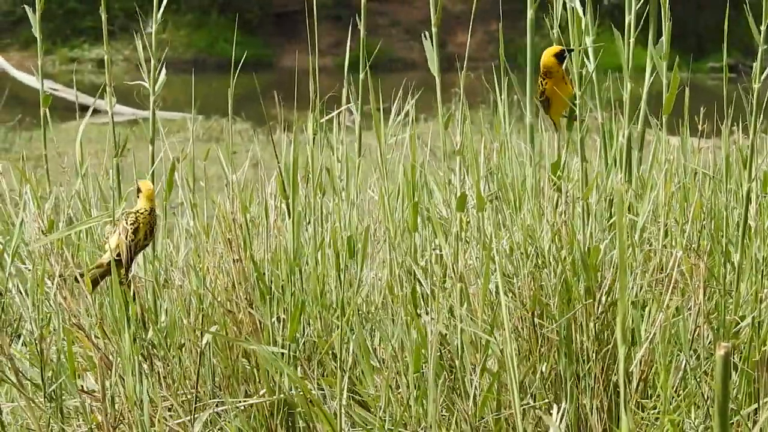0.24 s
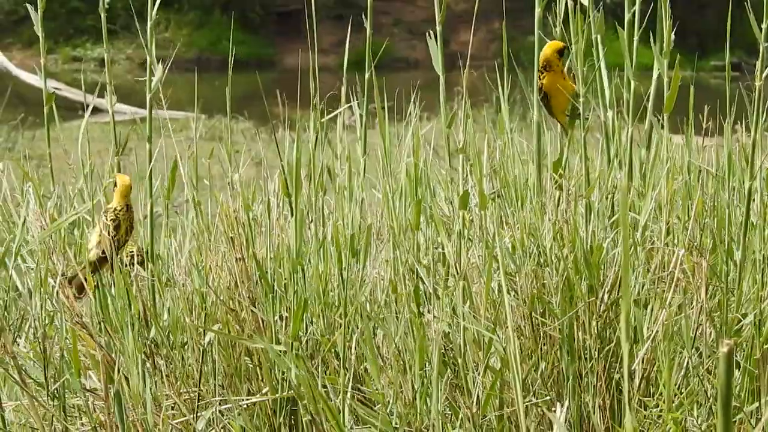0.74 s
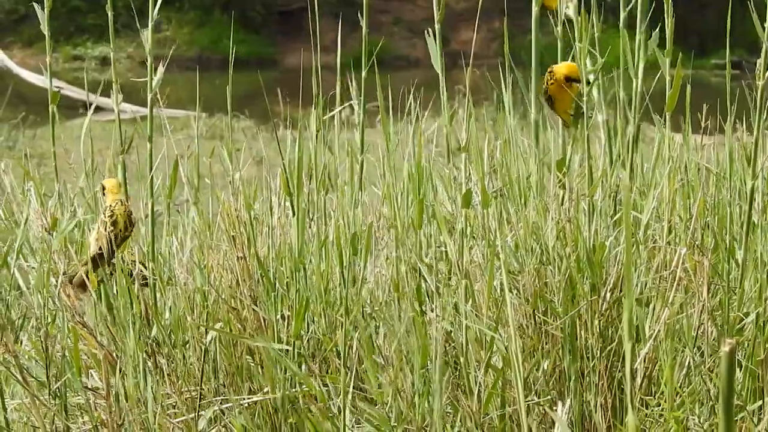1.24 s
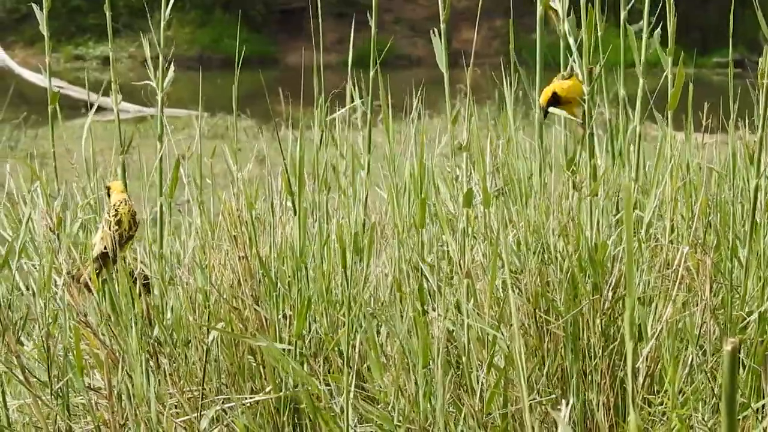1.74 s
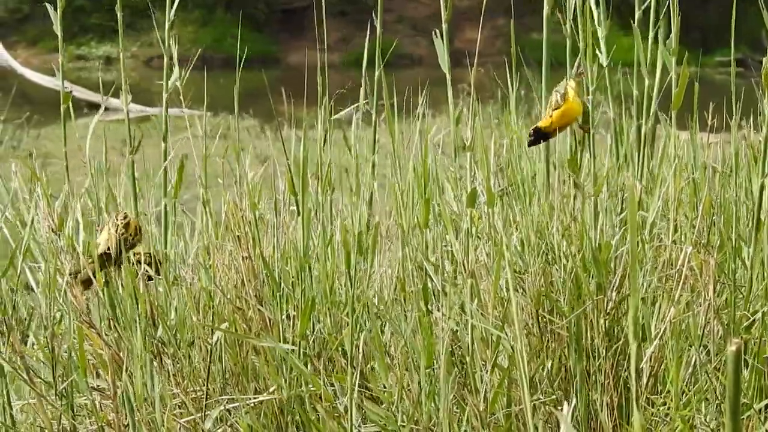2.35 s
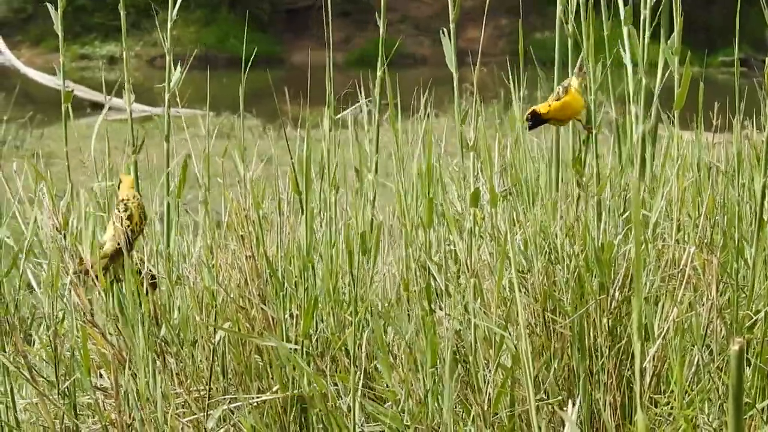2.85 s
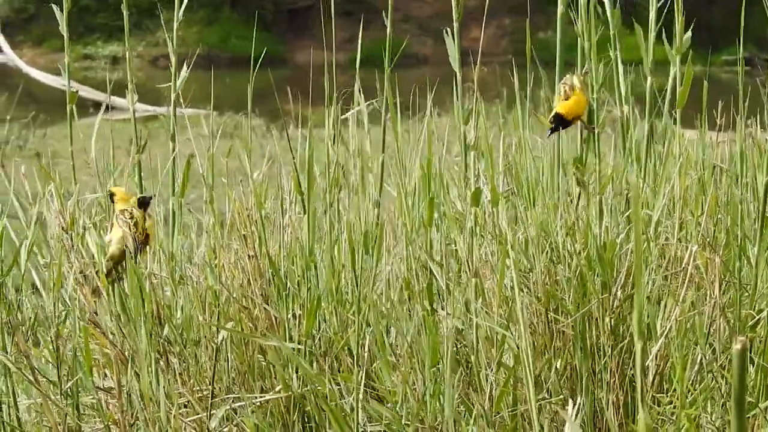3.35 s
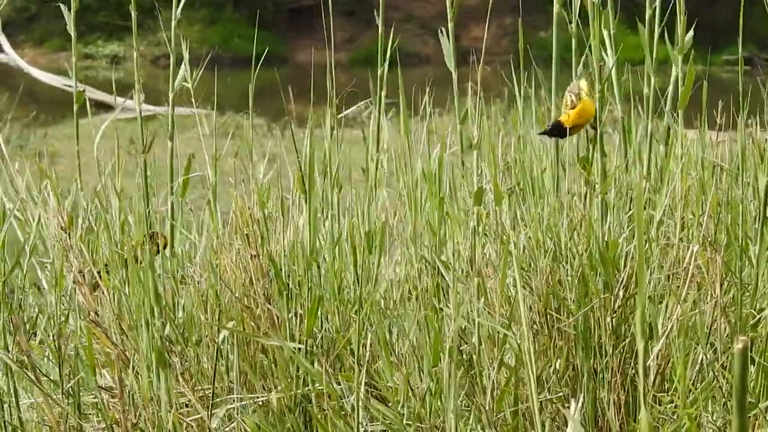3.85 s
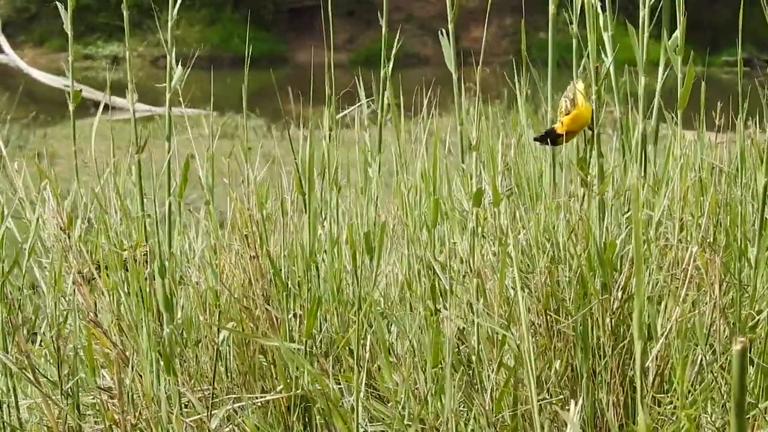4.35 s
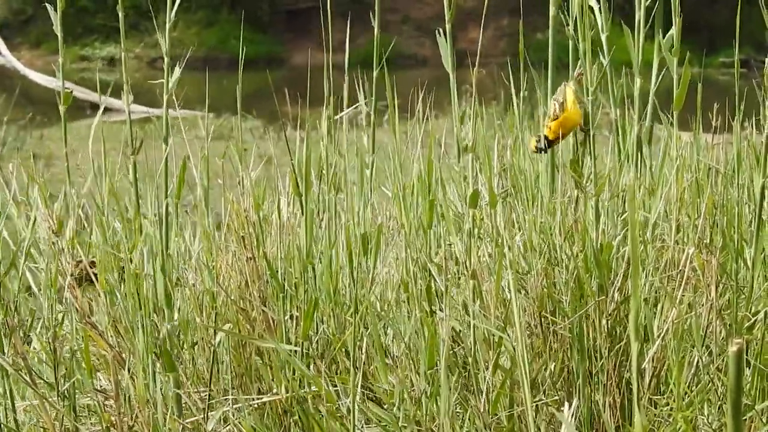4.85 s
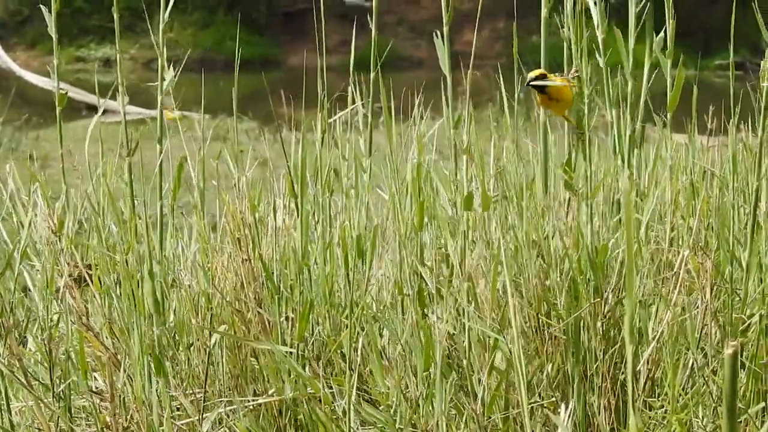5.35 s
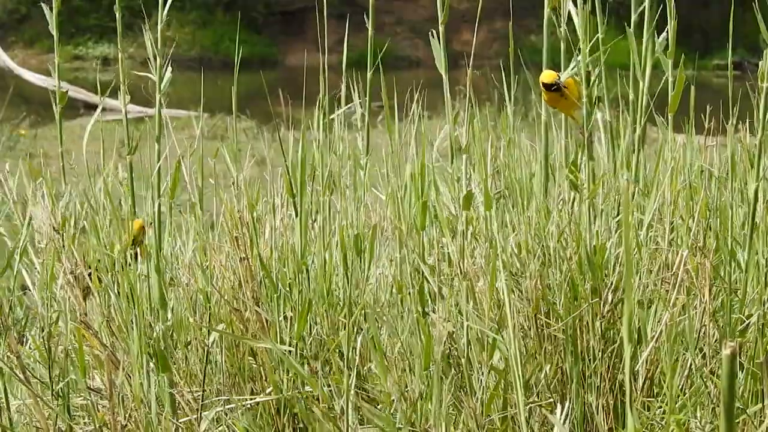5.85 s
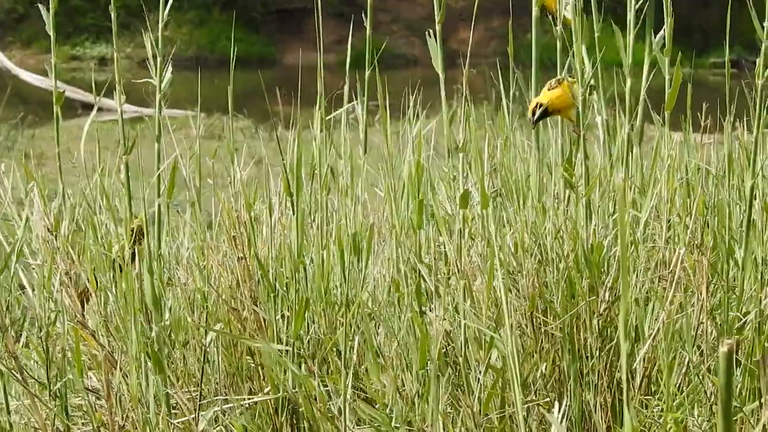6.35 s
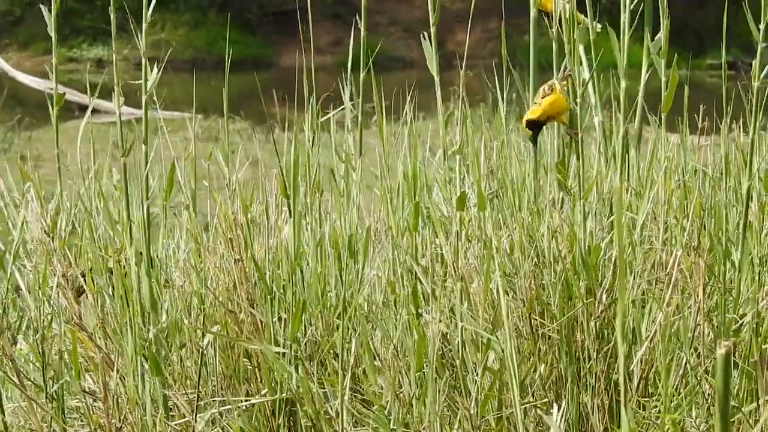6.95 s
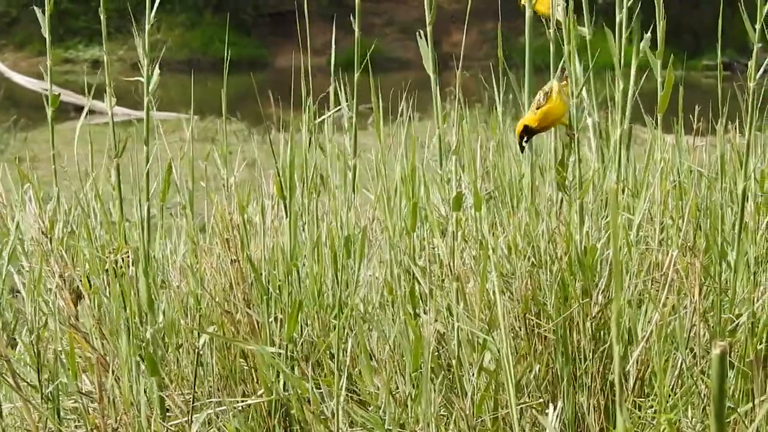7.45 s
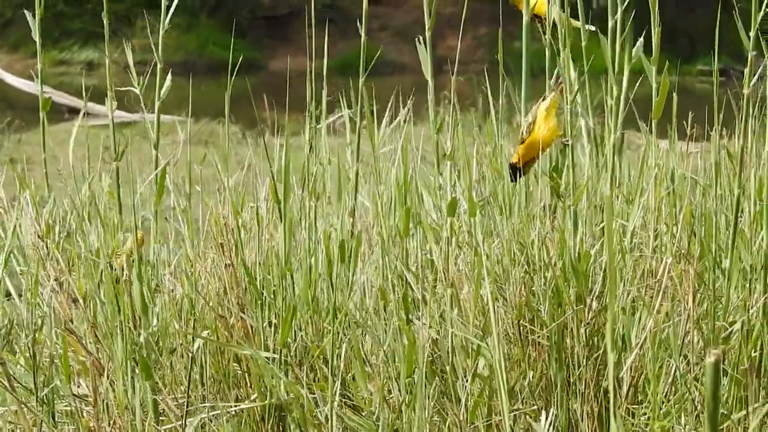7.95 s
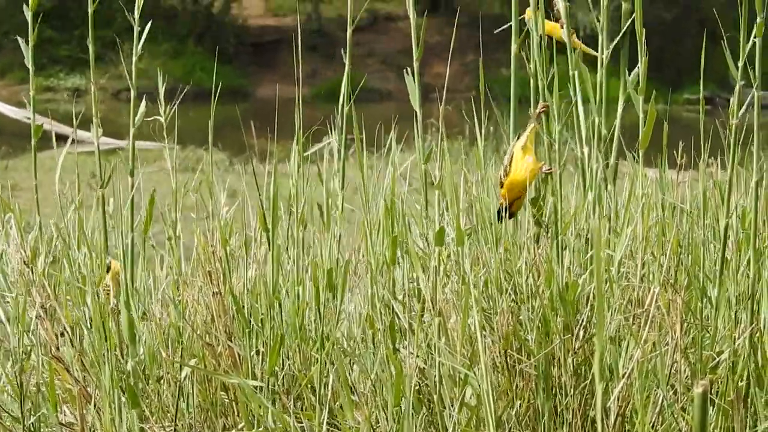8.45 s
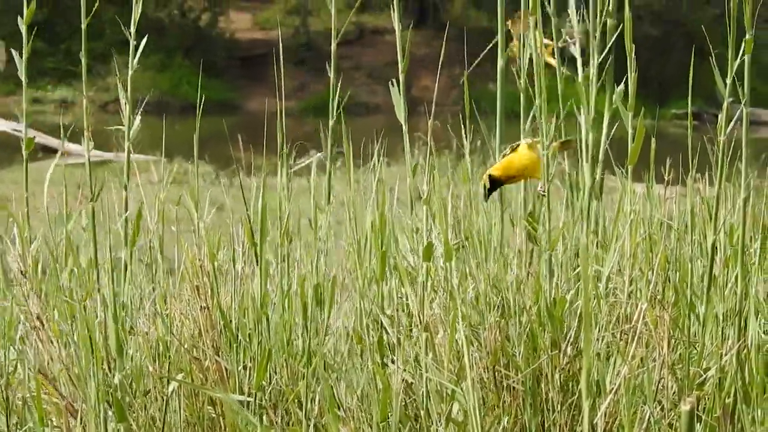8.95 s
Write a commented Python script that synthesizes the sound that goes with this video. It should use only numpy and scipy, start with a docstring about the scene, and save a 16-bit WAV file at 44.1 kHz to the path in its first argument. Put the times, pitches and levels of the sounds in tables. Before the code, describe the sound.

Harsh bird babble and shimmering high cricket trills outdoors; sharp double chips come first, then loud whistles, clicks and a buzzy wheeze build.

```python
"""Harsh chatter comes from all round a weaver colony in lakeside reeds: noisy pulses through throat bands.
Near, on the right of the stereo microphone, a male adds chips, sliding clicks, whistles and slides, all
bending tones, and a wheeze of pulses and breath in a two-resonance throat. Crickets trill in the grass as
scraped resonances; far traffic hums in narrow wavering bands over rumble; the banks return a short tail."""
import sys
import numpy as np
from scipy import signal
from scipy.fft import rfft, irfft, next_fast_len
from scipy.io import wavfile
from scipy.ndimage import uniform_filter1d, map_coordinates

SR = 44100
rng = np.random.default_rng(int(sys.argv[2]) if len(sys.argv) > 2 else 0)


def int16_out(signal):
    """Quantize to a 16-bit WAV file."""
    q = np.round(np.clip(np.atleast_2d(signal).T, -1, 1) * 32767)
    wavfile.write(sys.argv[1], SR, q.astype(np.int16))


N = 405719
TIME = np.arange(N) / SR  # seconds

# The near male's slides. Each row: start in seconds, length in seconds, start pitch in Hz, end pitch in Hz,
# level in dB.
SLIDE_NOTES = [(3.365, 0.04, 4600, 3930, -56), (3.391, .04, 3010, 2530, -60),
               (4.174, 0.044, 2900, 2170, -58), (4.172, 0.026, 2300, 1920, -65),
               (4.1, 0.033, 3880, 2980, -60), (3.645, .03, 3600, 2710, -60), (1.955, 0.1, 3710, 3240, -66),
               (4.182, 0.04, 3750, 3350, -53), (4.305, .016, 2710, 3570, -47.5),
               (4.28, .035, 3590, 2970, -56), (4.27, 0.032, 2300, 2050, -58),
               (4.165, 0.065, 5030, 4550, -56), (4.287, .045, 4900, 4480, -52),
               (4.393, 0.11, 1936, 2980, -49.5), (4.456, 0.0073, 5220, 4090, -30),
               (4.458, 0.02, 3190, 3500, -42), (4.677, 0.02, 4270, 4610, -34),
               (4.277, 0.041, 2910, 2400, -52), (4.385, 0.064, 4050, 5830, -47),
               (4.61, .022, 2320, 2570, -52), (4.614, 0.053, 4830, 6300, -43),
               (4.946, 0.026, 4280, 4540, -31.5), (5.136, 0.055, 4180, 4270, -40.5),
               (5.497, 0.016, 3630, 3170, -33), (5.728, 0.0306, 4320, 4930, -26),
               (5.413, .092, 4080, 4840, -43), (5.562, .016, 4570, 5900, -31.5),
               (5.623, 0.037, 7200, 5200, -29), (5.643, 0.0055, 4080, 5550, -23.5),
               (5.924, 0.01, 7440, 5200, -25.5), (6.001, .1, 7440, 4380, -21.5),
               (6.153, 0.026, 4410, 4900, -26), (6.298, 0.028, 5350, 5330, -33),
               (6.463, 0.0634, 1990, 2790, -46.5), (6.489, 0.0074, 5410, 4200, -23),
               (6.484, 0.046, 4300, 3400, -33), (6.8, 0.014, 5970, 4110, -30),
               (6.814, 0.023, 4290, 4470, -32), (6.84, 0.035, 4210, 4770, -28),
               (6.874, 0.021, 4370, 4120, -29.5), (6.981, .05, 6320, 4540, -32),
               (6.999, 0.05, 9180, 7700, -52), (7.057, 0.11, 7700, 4535, -22),
               (7.229, 0.0103, 3860, 5070, -23), (7.166, 0.05, 3790, 2816, -37.5),
               (7.71, 0.0086, 6870, 4490, -18), (7.739, 0.012, 5480, 4220, -24),
               (7.77, .009, 6950, 4190, -23), (7.915, 0.027, 5600, 4520, -22.5),
               (7.979, 0.073, 4780, 4426, -21.5), (8.086, 0.041, 5490, 4550, -21.5),
               (8.138, .122, 7520, 4470, -18), (8.3, 0.033, 3830, 2840, -43),
               (8.307, 0.053, 2974, 2572, -37.5), (8.397, .035, 5410, 5120, -27),
               (8.959, 0.02, 2440, 2730, -51.5), (9.039, 0.0216, 2110, 3010, -51)]
# His whistles, held and then bent. Each row: start in seconds, length in seconds, held pitch in Hz,
# end pitch in Hz, level in dB.
HELD_NOTES = [(0.126, 0.073, 2820, 2520, -56), (0.901, 0.076, 2830, 2750, -61),
              (1.225, 0.074, 2370, 2680, -55), (1.638, 0.055, 3410, 3130, -57),
              (2.216, 0.11, 3004, 2950, -58.5), (3.266, .03, 886, 870, -59), (3.46, .04, 2640, 2530, -60),
              (3.49, 0.12, 3300, 3200, -63), (3.522, 0.031, 4930, 4760, -50),
              (3.517, 0.034, 2500, 2280, -55), (3.613, 0.041, 4020, 3880, -55),
              (3.62, 0.034, 3030, 3090, -60), (3.828, 0.036, 4280, 4230, -50),
              (3.864, 0.12, 3435, 3540, -59), (3.951, .03, 4550, 4500, -52),
              (4.077, 0.024, 4050, 3950, -53), (4.423, .04, 4860, 5310, -33),
              (4.496, 0.082, 5000, 4950, -49), (4.702, 0.05, 5500, 5300, -37),
              (4.47, 0.023, 4820, 4500, -36), (4.41, 0.074, 5890, 5850, -44),
              (4.624, 0.068, 3290, 3096, -40.5), (4.654, 0.067, 6370, 6720, -30.5),
              (4.692, 0.024, 4180, 3840, -40), (4.885, 0.0575, 3184, 3430, -37.5),
              (4.952, 0.02, 2340, 2230, -46.5), (4.964, 0.041, 4000, 3960, -41),
              (4.968, .035, 5500, 5450, -44), (5.205, 0.028, 3975, 4040, -36.5),
              (5.499, 0.141, 3175, 2910, -43), (5.576, 0.12, 3670, 3820, -38.5),
              (5.588, 0.061, 7380, 6860, -33.5), (5.679, 0.056, 3870, 3850, -54),
              (5.753, 0.033, 4320, 4230, -30.5), (5.829, 0.115, 4590, 4566, -21),
              (5.932, 0.031, 5570, 4900, -24), (5.961, 0.024, 2950, 2360, -43),
              (6.11, 0.051, 6180, 5300, -25.5), (6.222, 0.052, 3240, 2760, -36),
              (6.334, 0.048, 5260, 5210, -22.5), (6.402, 0.028, 5230, 4820, -29),
              (6.434, 0.038, 5260, 5180, -30), (6.463, 0.0346, 5470, 5190, -18.5),
              (6.499, 0.047, 5220, 5370, -27), (6.538, 0.056, 5440, 4970, -29),
              (6.63, 0.047, 3180, 2830, -29.5), (6.641, 0.045, 5490, 4960, -30),
              (6.649, 0.027, 9100, 9200, -51), (6.68, 0.033, 4610, 3790, -27.5),
              (6.777, 0.062, 3570, 3470, -48), (6.811, 0.045, 2810, 2170, -43.5),
              (6.893, 0.056, 3010, 3150, -33), (6.897, 0.074, 4557, 4533, -26),
              (6.959, 0.016, 4590, 4420, -18.5), (6.962, 0.13, 2118, 1810, -43.5),
              (6.985, 0.035, 4490, 4460, -41), (7.038, 0.062, 5350, 5430, -34),
              (7.235, 0.02, 3990, 4270, -28.5), (7.236, 0.02, 5040, 4510, -21.5),
              (7.453, 0.076, 3317, 2870, -36.5), (7.526, 0.029, 3230, 3170, -53),
              (7.64, 0.036, 5530, 5670, -24), (7.651, 0.033, 4706, 4450, -19.5),
              (7.722, 0.055, 5600, 5430, -28), (8.107, 0.03, 3056, 2490, -38.5),
              (8.445, 0.1, 5430, 4990, -24.5), (8.55, 0.033, 5320, 4400, -30),
              (8.588, 0.062, 5390, 5420, -27.5)]
# Where a note stands: higher ones lie further right. Each row: pitch in Hz, left over right in dB.
NOTE_PAN = [(2500, -0.5), (4000, -1), (5500, -7)]
# Double chips. Each row: start in seconds, chip level in dB, snap level in dB.
DOUBLE_CHIPS = [(0.023, -26, -23), (0.3634, -26, -21.5), (0.7435, -26.5, -25.5), (1.0544, -26.5, -24.5),
                (1.4641, -29.5, -22.5), (8.7881, -23, -14.5)]
# Sliding clicks, single or in rattled trills. Each row: start in seconds, length in seconds,
# clicks per second, pitch in Hz, fall of one click in natural-log pitch (negative rises), level in dB.
SLIDING_CLICKS = [(4.448, .04, 200, 2690, 0.23, -47), (4.678, .006, 75, 3070, 1, -25),
                  (4.686, .035, 186, 2350, -0.39, -40.5), (4.942, 0.0051, 80, 3300, 1.1, -23),
                  (4.458, .005, 84, 3640, 0.51, -28), (4.95, .022, 218, 2200, -.3, -46),
                  (7.605, .065, 180, 2870, -0.29, -38), (4.697, 0.07, 194, 4970, 0.4, -27.5),
                  (4.47, .04, 220, 4780, .3, -33), (5.21, .034, 230, 4960, -.15, -27),
                  (5.215, .03, 233, 3990, -.1, -30.5), (5.2, .04, 205, 2600, -0.54, -40.5),
                  (7.376, .02, 170, 4770, 0.019, -31), (5.12, .09, 150, 2910, .5, -38.5),
                  (5.133, .056, 128, 4250, .12, -29.5), (5.186, .03, 210, 4180, .3, -34),
                  (4.68, .03, 240, 4500, -.2, -28.5), (5.291, 0.064, 212, 6070, -0.22, -19),
                  (5.325, 0.057, 166, 2680, -0.55, -39.5), (5.398, 0.095, 137, 5340, -0.43, -29.5),
                  (5.647, 0.046, 220, 5290, 0.23, -27), (5.752, 0.097, 120, 3590, -0.67, -31.5),
                  (6.266, .04, 217, 6640, 0.18, -24.5), (6.295, .045, 220, 6240, 0.18, -18),
                  (6.696, .06, 170, 4400, .2, -36), (7.134, 0.067, 152, 4230, 0.34, -21.5),
                  (7.309, .03, 98, 2890, 0.66, -29), (7.7, 0.022, 185, 4450, 0.0032, -27),
                  (7.79, 0.025, 170, 4570, .2, -22), (7.833, 0.03, 285, 4900, -0.35, -17),
                  (7.835, 0.045, 190, 2970, 0.0092, -32.5), (7.931, 0.068, 89, 4825, -0.29, -17.5)]
# The male's wheezes. Each row: start in seconds, end in seconds, throat centre in Hz, level in dB.
WHEEZES = [(1.167, 1.356, 5940, -42.5), (6.742, 7.705, 5748, -25.5), (7.913, 8.392, 6004, -25.5)]
# Harsh "chek" calls of the nearer birds. Each row: start in seconds, length in seconds before smearing,
# low-band level in dB before shaping.
CHEK_CALLS = [(0.11, 0.025, -59), (0.194, 0.024, -62), (0.27, 0.025, -60.5), (0.353, 0.066, -54),
              (0.532, 0.055, -55), (0.646, 0.033, -58), (0.693, 0.019, -60), (0.73, 0.098, -61.5),
              (0.864, 0.091, -63), (1.043, 0.083, -59.5), (1.12, 0.04, -57), (1.183, 0.014, -55.5),
              (1.367, 0.051, -62), (1.42, 0.021, -59), (1.454, 0.081, -56), (1.657, 0.059, -57),
              (1.792, 0.05, -56.5), (1.834, 0.068, -54.5), (1.905, .03, -63.5), (2.04, 0.056, -56.5),
              (2.11, 0.11, -59.5), (2.163, 0.03, -69.5), (2.336, 0.053, -56), (2.38, 0.027, -55),
              (2.406, .05, -60.5), (2.578, 0.047, -61), (2.608, 0.061, -53.5), (2.808, 0.023, -62),
              (2.666, 0.038, -56.5), (2.927, 0.022, -58), (2.974, 0.029, -57), (3.039, 0.053, -62.5),
              (3.126, 0.068, -62.5), (3.203, 0.041, -63), (3.434, 0.17, -63), (3.306, 0.03, -64),
              (3.66, 0.03, -61), (3.703, .018, -67), (3.864, 0.03, -60.5), (3.974, 0.026, -58),
              (4.026, 0.015, -55.5), (4.059, 0.026, -56.5), (4.199, 0.031, -54), (4.252, 0.011, -55.5),
              (4.255, 0.1, -67), (4.465, 0.045, -51.5), (4.52, .035, -59.5), (4.683, 0.05, -57),
              (4.75, 0.082, -58), (4.947, 0.06, -59), (5.039, 0.047, -60), (5.122, 0.15, -59),
              (5.352, 0.17, -64), (5.545, 0.099, -55.5), (5.778, 0.08, -61.5), (5.929, 0.019, -59),
              (5.971, 0.13, -56), (6.082, 0.15, -63.5), (6.411, 0.14, -56), (6.596, 0.19, -59.5),
              (6.861, 0.067, -59.5), (7.16, 0.091, -59.5), (7.307, 0.029, -65), (7.485, 0.061, -54.5),
              (7.61, 0.065, -60), (7.776, 0.051, -54), (7.835, 0.016, -53.5), (7.941, 0.078, -65),
              (8.256, 0.042, -60), (8.42, 0.051, -58), (8.516, 0.11, -58), (8.605, 0.033, -59),
              (8.68, 0.025, -66.5), (8.757, 0.12, -64), (8.933, .024, -67), (8.998, 0.07, -64)]
# Shrillness of the cheks, growing as the song builds and dropping at the end. Each row: time in seconds,
# high band over low band in dB.
CHEK_SHRILLNESS = [(0, 7.5), (2, 8.5), (3, 7.5), (4.2, 8), (4.9, 14), (6.2, 19), (8.8, 19.5), (9.2, 7)]
# The colony's blurred babble. Each row: time in seconds, low-band level in dB, high-band level in dB.
BABBLE_LEVELS = [(0.0, -66, -52), (0.87, -72.5, -62.5), (1.61, -68, -56), (2.43, -81.5, -76),
                 (3.61, -74.5, -70), (4.9, -70, -56.5), (5.1, -68.5, -68), (5.16, -66, -49),
                 (6.02, -61.5, -45), (6.2, -58, -39.5), (6.35, -61, -46), (6.48, -61, -42),
                 (7.15, -60, -40), (7.48, -61.5, -57.5), (7.76, -60, -29), (7.825, -62.5, -55),
                 (7.85, -60.5, -38), (8.0, -60, -33), (8.3, -63, -57.5), (8.87, -68.5, -68),
                 (9.2, -69, -58.5)]
# Lower throat band of the chatter. Each row: frequency in Hz, response in dB.
LOW_THROAT_BAND = [(700, -26), (1100, -1), (1500, 7.5), (2100, 10.5), (2700, 8), (3200, 1.5), (4000, -29.5)]
# Upper throat band of the chatter. Each row: frequency in Hz, response in dB.
HIGH_THROAT_BAND = [(3300, -33), (4000, -5), (4600, 5.5), (5500, 5), (6500, 7.5), (7600, 0.5),
                    (9000, -14.5), (10500, -37.5), (15000, -70.5)]
# Extra band of excited calls. Each row: frequency in Hz, response in dB.
OPEN_BEAK_BAND = [(1800, -38.5), (2400, -3), (3000, 4.5), (3500, 4), (4200, -34)]
# Treble of the male's song and the colony's slides after air and reeds. Each row: frequency in Hz,
# response in dB.
REED_RESPONSE = [(6800, -3.5), (8500, 3.5), (11000, -8.5), (15000, -22)]
# Bouts of near crickets. Each row: start in seconds, end in seconds, steady pitch in Hz, level in dB,
# left over right in dB.
CRICKET_BOUTS = [(0, 0.395, 6630, -38.5, 5), (1.115, 3.07, 6690, -40.5, 6), (3.785, 5.702, 6665, -41, 1),
                 (6.357, 8.352, 6510, -40.5, -1), (8.981, 9.187, 6610, -41, 8.5),
                 (1.161, 3.032, 6445, -57, 27.5), (3.738, 5.698, 6530, -57, 29),
                 (7.266, 9.032, 6310, -38.5, -0.5)]
# The far cricket chorus. Each row: pitch in Hz, level within the chorus in dB.
FAR_CRICKETS = [(6800, 1.5), (6900, -7.5), (6980, 1.5), (7050, -2), (7130, -21), (7230, -4), (7320, -6.5)]
# Spectrum of the far rumble. Each row: frequency in Hz, relative level in dB.
RUMBLE_SPECTRUM = [(25, -55), (33, -42), (40, -18), (58, 0.5), (106, -2.5), (211, -3), (291, -15),
                   (504, -18), (936, -18.5), (1820, -24), (3700, -23), (6000, -25), (7800, -54.5),
                   (13000, -120)]
# Wavering traffic hums. Each row: frequency in Hz, resonance width in Hz, level in dB.
TRAFFIC_HUMS = [(156, 9.2, -75), (188.6, 17, -60)]
# Swell and fade of the lowest hum. Each row: time in seconds, level in dB.
LOWEST_HUM_LEVEL = [(0, -68), (.84, -61), (3.61, -57), (6.43, -75), (9.2, -69.5)]
# How alike diffuse noise is at the two channels. Each row: frequency in Hz, left-right correlation.
CHANNEL_LIKENESS = [(60, 0.95), (240, 0.86), (480, 0.65), (1900, 0.9), (3800, 0.91), (7000, 0.05)]

NOTE_ATTACK, NOTE_RELEASE = 0.22, 0.29  # shares of a note
SETTLE_S, FADE_DB_PER_OCTAVE = 0.061, 3  # how soon a slide slows; falling notes fade, rising ones swell
SCOOP, BEND_POWER = 0.021, 2.65  # starts this share flat; the higher the power, the later the bend
HUSH_DB, CROWD_DB = -72, -60  # low babble levels at which no bird, and every bird, adds a slide
SNAP_AFTER_S, CHIP_HZ, SNAP_HZ, CHIP_PAN_DB, SNAP_PAN_DB = 0.023, 5130, 5900, -8.5, -3.5
CLICK_DUTY, CLICK_SCATTER = 0.75, 0.1  # click length and timing scatter, in click periods
WHEEZE_PULSES_PER_S = 300  # on average
WHEEZE_WIDTH_HZ, WHEEZE_SPLIT_HZ = 374, 260  # two throat resonances, each this far from the centre
WHEEZE_ATTACK_S, WHEEZE_RELEASE_S = 0.051, 0.061
CHEK_SMEAR_S = 0.004  # added to the length of every call
CHEK_ATTACK_S, CHEK_RELEASE = 0.0051, 0.57  # shortest rise; share of a call spent dying away
WARM_UP_HZ, WARM_UP_S = 125.2, 0.22  # a cricket starts this flat and warms up over this time constant
CHORUS_DB, RUMBLE_DB, HISS_DB = -36, -57.5, -78
TOP_HZ = 15720  # band limit of the microphone channels


def slide(u, length, start_hz, end_hz):
    """Pitch that moves fast at first and settles exponentially, more so in long notes."""
    k = 0.55 + length / SETTLE_S
    progress = (1 - np.exp(-k * u)) / (1 - np.exp(-k))
    return start_hz * (end_hz / start_hz) ** progress


def hold(u, length, held_hz, end_hz):
    """Pitch that scoops up, stays and bends away late."""
    scoop = 1 - SCOOP * (1 - u) ** 3
    return held_hz * scoop * (end_hz / held_hz) ** (u ** BEND_POWER)


def whistle(law, length, from_hz, to_hz, db, pan_db, hoarse):
    """One note with a weak octave; hoarseness smears it into a narrow band."""
    u = np.linspace(0, 1, round(length * SR))
    voice = tone(law(u, length, from_hz, to_hz))
    edges = np.sin(np.pi / 2 * np.clip(np.minimum(u / NOTE_ATTACK, (1 - u) / NOTE_RELEASE), 0, 1))
    rough = unit(1 + hoarse * flutter(len(u), width_hz=336))
    octave = amp(-33.5) * voice ** 2
    sound = (voice * rough + octave).real * np.sqrt(2)
    swell_db = FADE_DB_PER_OCTAVE * np.log2(to_hz / from_hz) * (u - 0.5)
    return amp(db + swell_db) * edges * sound * sides(pan_db)


def near_notes():
    """The near bird's slides and whistles: short notes are hoarser, faint short ones most of all."""
    out = np.zeros((2, N))
    for law, rows in [(slide, SLIDE_NOTES), (hold, HELD_NOTES)]:
        for s, length, from_hz, to_hz, db in rows:
            faint = db < -45 and length < 0.06
            hoarse = min(0.12 + 0.014 / length + 0.7 * faint, 1.3)
            pan_db = along(NOTE_PAN, np.sqrt(from_hz * to_hz))
            add(out, s, whistle(law, length, from_hz, to_hz, db, pan_db, hoarse))
    return out


def click(hz, fall, length):
    """A very fast, roughened slide around hz that rises sooner than it dies."""
    u = np.linspace(0, 1, round(length * SR))
    glide = tone(hz * np.exp(fall * (0.5 - u)))
    rough = 1 + 0.5 * flutter(len(u), width_hz=1230)
    return (glide * rough).real * np.sin(np.pi * u ** 0.75) ** 2


def chips():
    """The first chip of a pair is nearly level in pitch, the second a brief rising snap."""
    out = np.zeros((2, N))
    for s, chip_db, snap_db in DOUBLE_CHIPS:
        chip = amp(chip_db) * click(CHIP_HZ, fall=0.08, length=0.007)
        snap = amp(snap_db) * click(SNAP_HZ, fall=-0.4, length=0.005)
        add(out, s - 0.001, chip * sides(CHIP_PAN_DB))
        add(out, s - 0.001 + SNAP_AFTER_S, snap * sides(SNAP_PAN_DB))
    return out


def sliding_clicks():
    """Sliding clicks, single or in rattled trills, scattered in time and level; longer rows swell and fade."""
    out = np.zeros((2, N))
    for s, length, rate, hz, fall, db in SLIDING_CLICKS:
        for at in np.arange(0, length, 1 / rate):
            swell = np.sin(np.pi * (0.1 + 0.8 * at / length)) ** 1.3
            size = amp(db + rng.normal(0, 1.8)) * swell
            when = s + at + rng.normal(0, CLICK_SCATTER / rate)
            add(out, when, size * click(hz, fall, CLICK_DUTY / rate) * sides(-2.0))
    return out


def wheeze():
    """Fast, unsteady pulses and breath noise ring the male's throat."""
    out = np.zeros(N)
    rate = WHEEZE_PULSES_PER_S * np.exp(0.04 * wobble(20) + 0.08 * wobble(250))
    pulses = pulse_train(rate) * amp(2.5 * wobble(280))
    for start, end, hz, db in WHEEZES:
        t = TIME[:round((end - start) * SR)]
        pair_hz = hz + WHEEZE_SPLIT_HZ * np.array([-1, 1])
        poles = np.exp((2j * np.pi * pair_hz - np.pi * WHEEZE_WIDTH_HZ) / SR)
        ring = unit(signal.lfilter([1], np.poly(poles), pulses[round(start * SR):][:len(t)]))
        breath = unit(sum(tone(np.full(len(t), f)) * flutter(len(t), WHEEZE_WIDTH_HZ) for f in pair_hz))
        edges = np.clip(np.minimum(t / WHEEZE_ATTACK_S, (t[-1] - t) / WHEEZE_RELEASE_S), 0, 1)
        add(out, start, amp(db) * edges * (0.75 * ring + 0.65 * breath).real * np.sqrt(2))
    return out * sides(-7.0)


def colony_slides(count=900):
    """Brief hoarse slides from the rest of the colony, more and louder where the babble is loud."""
    out = np.zeros((2, N))
    at, low_db, high_db = np.transpose(BABBLE_LEVELS)
    for when, place, size, fall, loud, side, shy in rng.random((count, 7)):
        s, hz = when * N / SR, 1800 * 3.4 ** place
        if shy > np.interp(np.interp(s, at, low_db), [HUSH_DB, CROWD_DB], [0, 1]):
            continue
        db = np.interp(s, at, low_db if hz < 3700 else high_db) + 8 * loud - 5
        from_hz, to_hz = hz * np.exp([0.35 * (fall - 0.35), -0.15 * (fall - 0.35)])
        pan_db = along(NOTE_PAN, hz) + 6 * side - 3
        add(out, s, whistle(slide, 0.012 + 0.03 * size, from_hz, to_hz, db, pan_db, hoarse=0.6))
    return out


def throat_voice(pulses, throat):
    """The syrinx claps shut in pulses, half lost in breath noise, both coloured by one throat band."""
    voiced = unit(filtered(pulses, lambda hz: amp(along(throat, hz))))
    return 0.65 * voiced + 0.75 * rush(throat)


def chatter():
    """Rough voiced calls in two throat bands: near ones stand out, the far ones blur into babble."""
    low_db, high_db = curves(BABBLE_LEVELS)
    low, high = amp(low_db + 3 * wobble(18)), amp(high_db + 3 * wobble(18))
    for s, length, db in CHEK_CALLS:
        t = TIME[:round((length + CHEK_SMEAR_S) * SR)]
        rise = t / (CHEK_ATTACK_S + 0.1 * length)
        fall = (t[-1] - t) / (CHEK_RELEASE * t[-1])
        shape = 0.85 * np.clip(np.minimum(rise, fall), 0, 1) ** 1.46
        shrill_db = np.interp(s, *np.transpose(CHEK_SHRILLNESS))
        add(low, s - 0.004, amp(db) * shape)
        add(high, s - 0.004, amp(db + shrill_db) * shape)
    rate = 400 * np.exp(0.2 * wobble(25) + 0.035 * wobble(200))  # claps per second
    pulses = pulse_train(rate) * amp(1.2 * wobble(300))
    stutter = amp(1.3 * wobble(40) + 1.5 * wobble(140))  # the level rattles within the calls
    excited = amp(1.54 * (low_db + 65.0))  # a louder colony opens its beaks wider
    low, high = low * stutter, high * stutter
    lower = throat_voice(pulses, LOW_THROAT_BAND) + excited * throat_voice(pulses, OPEN_BEAK_BAND)
    upper = throat_voice(pulses, HIGH_THROAT_BAND)
    return patchy(low * lower * sides(-0.56) + high * upper * sides(-3.5), depth_db=4.0)


def banks(x, t60):
    """Reeds and banks scatter the calls into a short tail that differs from side to side, most in the treble."""
    t = np.arange(SR // 3) / SR
    decay = amp(-60 * t / t60) * (t > 0.004)  # nothing returns in the first 4 ms
    tail = rush([(20, 0), (20000, 0.011)])[:, :len(t)] * decay
    return signal.fftconvolve(x, tail / np.linalg.norm(tail[0]), axes=1)[:, :N]


def stridulate(hz, rate, width_hz, depth):
    """Wing strokes: each scrapes a narrow resonance whose pitch sags through the stroke."""
    stroke = (rate * TIME[:len(hz)] + 0.18 * wobble(3)[:len(hz)] + rng.random()) % 1
    shape = 1 - depth + depth * np.sin(np.pi * np.clip(stroke / 1.04, 0, 1))
    # the grass scatters it apart between left and right
    rasp = 0.5 + np.array([flutter(len(hz), width_hz), flutter(len(hz), width_hz)])
    scrape = tone(hz * (1 - 0.011 * (stroke - 0.3))) * rasp
    return unit(scrape.real * shape)


def near_crickets():
    """Near crickets start and stop; those that start after the opening warm up in pitch."""
    out = np.zeros((2, N))
    for start, end, hz, db, pan_db in CRICKET_BOUTS:
        t = TIME[(TIME >= start) & (TIME < end)] - start
        pitch = hz - WARM_UP_HZ * (start > 0) * np.exp(-t / WARM_UP_S)
        fade = np.clip(np.minimum(t, t[-1] - t) / 0.018, 0, 1)
        trill = stridulate(pitch, rate=26.2, width_hz=110, depth=0.6)
        add(out, start, amp(db) * fade * trill * sides(pan_db))
    return out


def far_crickets():
    """Far crickets scrape without a break at slightly different rates and merge."""
    chorus = np.zeros((2, N))
    for hz, own_db in FAR_CRICKETS:
        level = amp(own_db + 2.5 * wobble(0.77))
        rate = 26.4 + 0.399 * rng.normal()
        chorus += level * stridulate(hz + 25 * wobble(0.7), rate, width_hz=152, depth=0.53)
    return amp(CHORUS_DB) * unit(chorus) * sides(0.58)


def hum(hz, width_hz):
    """A tone wavering in level and phase, as narrow as its resonance."""
    return (tone(np.full(N, hz)) * flutter(N, width_hz)).real


def air():
    """Far rumble with wavering traffic hums, and the microphone's hiss."""
    rumble = amp(RUMBLE_DB) * patchy(rush(RUMBLE_SPECTRUM), depth_db=3.0)
    hums = sum(amp(db) * hum(hz, width_hz) for hz, width_hz, db in TRAFFIC_HUMS)
    lowest = amp(curves(LOWEST_HUM_LEVEL)[0]) * hum(113.0, width_hz=11)
    hiss = rush([(9000, -15.0), (11500, -3.0), (13500, 2.0), (15700, -2.0)])  # (Hz, dB)
    return rumble + lowest + hums + amp(HISS_DB) * hiss


def amp(db):
    """Gain for a level in dB."""
    return 10 ** (np.asarray(db) / 20)


def unit(x):
    """x scaled to rms 1."""
    return x / np.sqrt(np.mean(np.abs(x) ** 2) + 1e-20)


def along(points, hz):
    """(Hz, value) points read on a log frequency axis."""
    f, v = np.transpose(points)
    return np.interp(np.log(hz + 1), np.log(f + 1), v)


def curves(rows):
    """One value per sample for each column after the time."""
    s, *cols = np.transpose(rows)
    return [np.interp(TIME, s, c) for c in cols]


def wobble(rate):
    """A smooth random curve, rate knots a second."""
    coarse = TIME[::32]
    knots = rng.standard_normal(int(N * rate / SR) + 4)
    return np.interp(TIME, coarse, map_coordinates(knots, [coarse * rate]))


def tone(hz):
    """A complex oscillation that follows a pitch curve."""
    return np.exp(2j * np.pi * np.cumsum(hz) / SR)


def pulse_train(rate):
    """A single-sample pulse at each whole cycle of a varying rate."""
    return np.diff(np.floor(np.cumsum(rate) / SR), prepend=0)


def flutter(length, width_hz, share=0.92):
    """A complex envelope of rms 1: a share of the samples kick a resonance of this width."""
    kicks = (rng.standard_normal(length) + 1j * rng.standard_normal(length)) * (rng.random(length) < share)
    pole = np.exp(-np.pi * width_hz / SR)
    return unit(signal.lfilter([1], np.poly([pole, pole]), kicks))


def filtered(x, response):
    """x times a response of frequency."""
    m = next_fast_len(N + 8192)
    return irfft(rfft(x, m) * response(np.fft.rfftfreq(m, 1 / SR)), m)[..., :N]


def rush(spectrum):
    """Stereo noise of rms 1: shared mid and opposed side noise mixed to the channel likeness."""
    def colour(hz):
        turn = np.arccos(np.clip(along(CHANNEL_LIKENESS, hz), -1, 1)) / 2
        return amp(along(spectrum, hz)) * [np.cos(turn), np.sin(turn)]
    mid, side = filtered(rng.standard_normal((2, N)), colour)
    return unit(np.array([mid + side, mid - side]))


def patchy(x, depth_db):
    """Random gain over small patches of time and pitch: no moment keeps one colour."""
    z = signal.stft(x, nperseg=512)[2]
    field = uniform_filter1d(rng.standard_normal(z.shape[1:]), size=3, axis=0)  # across pitch
    field = uniform_filter1d(field, size=5, axis=1)  # across time
    return signal.istft(z * amp(depth_db * unit(field)), nperseg=512)[1][:, :N]


def sides(db):
    """Left and right gains for a level difference; negative leans right."""
    return amp(np.array([db / 2, -db / 2])).reshape(2, -1)


def add(track, s, sound):
    """Mixes a sound in at a time in seconds."""
    part = track[..., round(max(s, 0) * SR):][..., :sound.shape[-1]]
    part += sound[..., :part.shape[-1]]


def scene():
    """Birds with their tail off the banks, then crickets and the far background."""
    notes = near_notes() + colony_slides() + chips() + sliding_clicks() + wheeze()
    birds = filtered(notes, lambda hz: amp(along(REED_RESPONSE, hz))) + chatter()
    return birds + amp(-5) * banks(birds, t60=0.3) + near_crickets() + far_crickets() + air()


def record(dry):
    """Sound reaches the right microphone port a little first; nothing is kept above the band limit."""
    lag = np.array([[1], [-1]]) * 0.61 / SR  # seconds, left late and right early
    return filtered(dry, lambda hz: np.exp(-2j * np.pi * hz * lag) * (hz < TOP_HZ))


dry = scene()
out = record(dry)
int16_out(out)
```